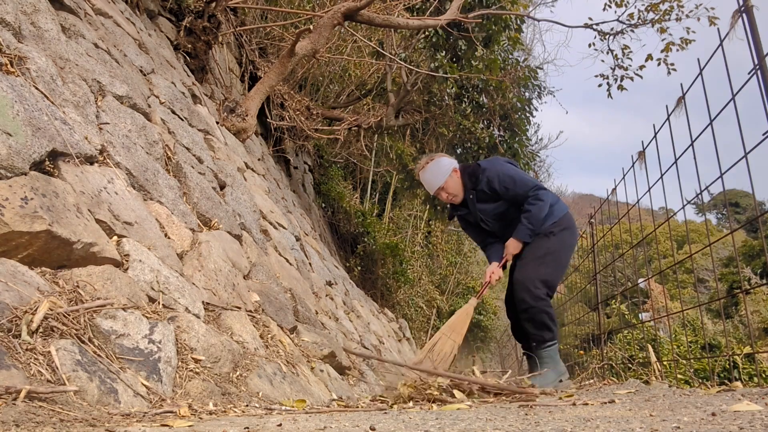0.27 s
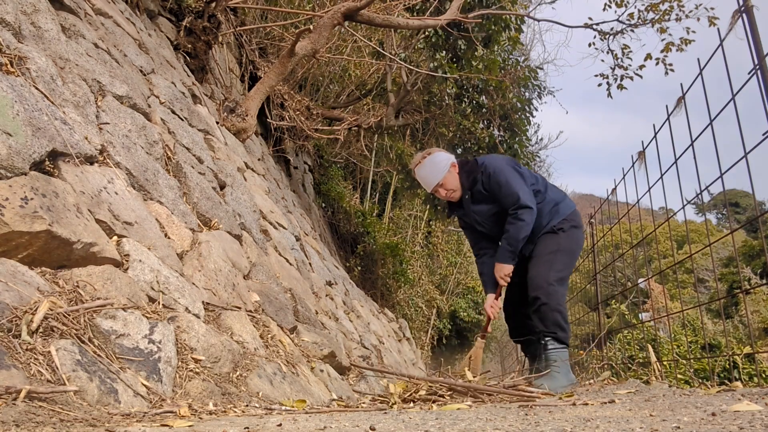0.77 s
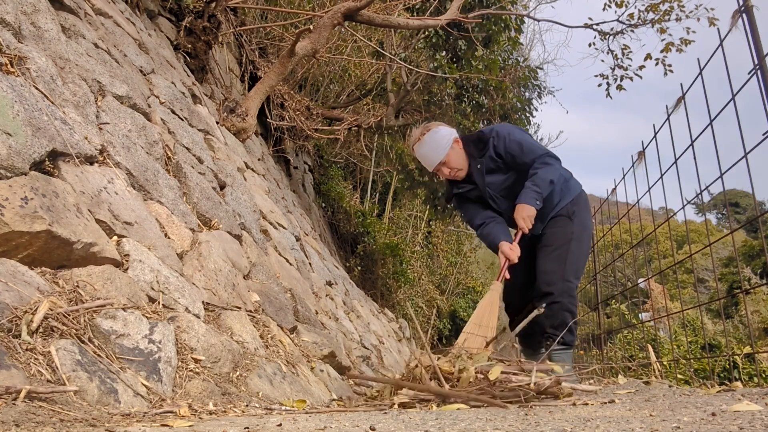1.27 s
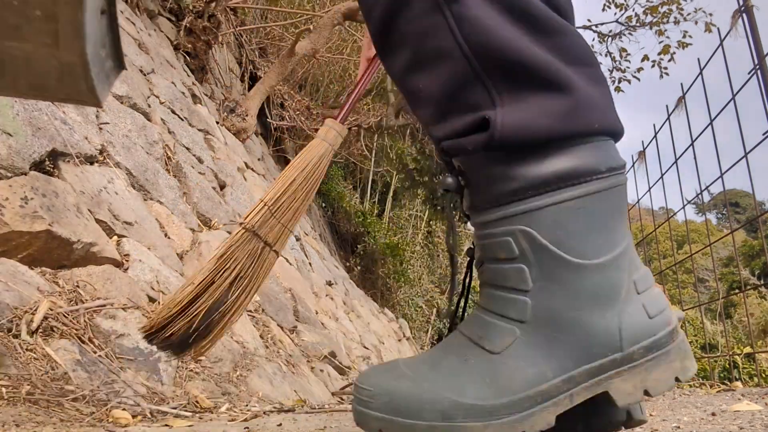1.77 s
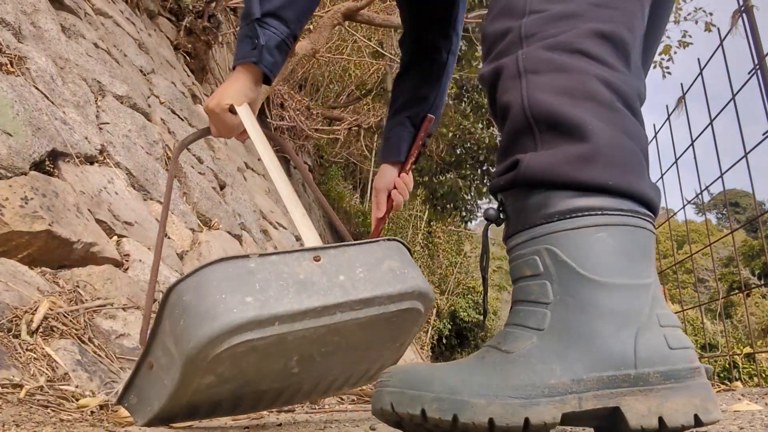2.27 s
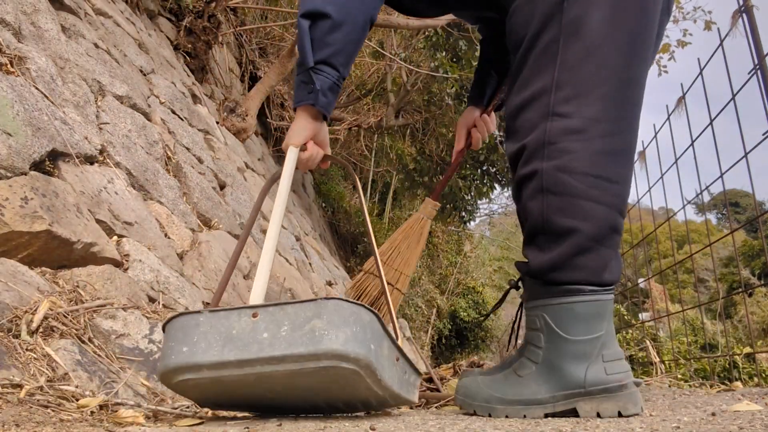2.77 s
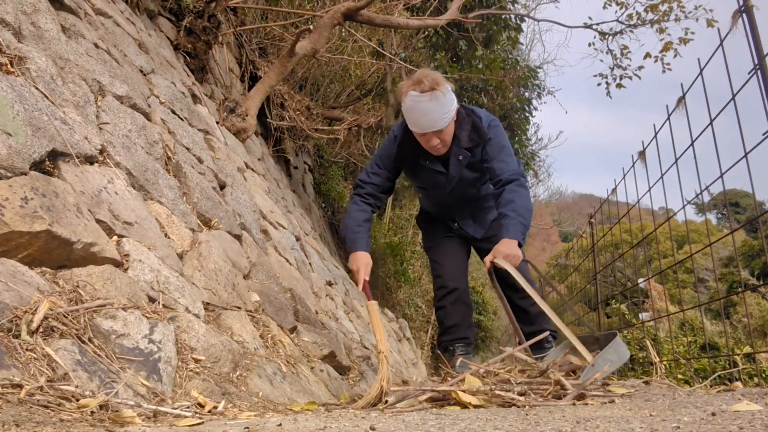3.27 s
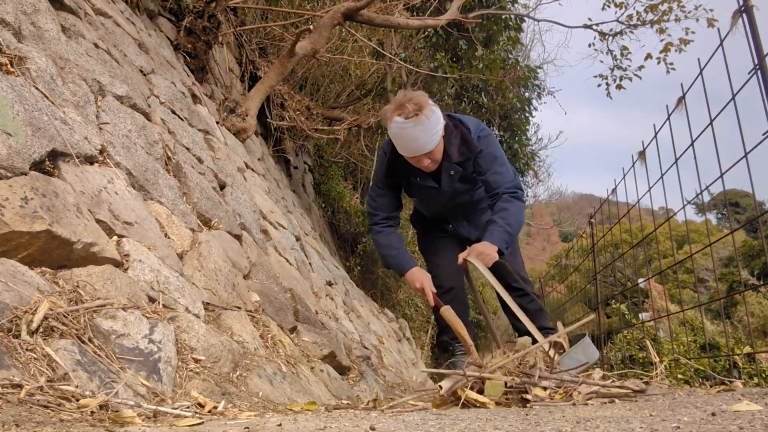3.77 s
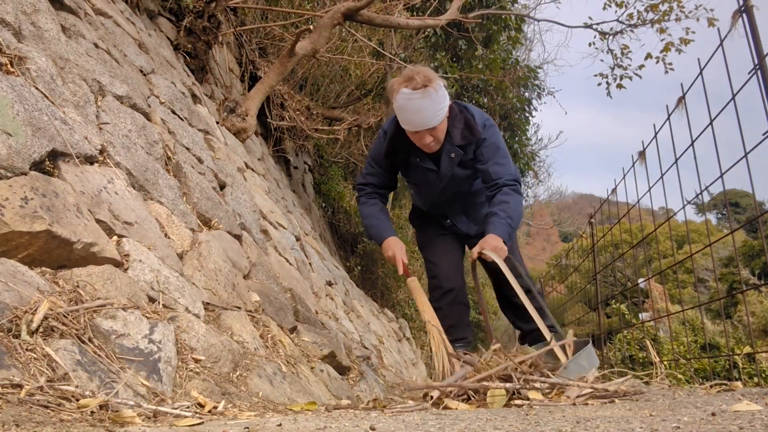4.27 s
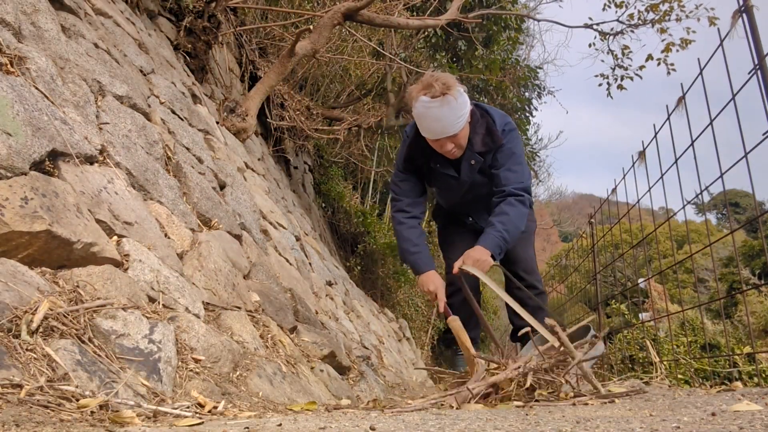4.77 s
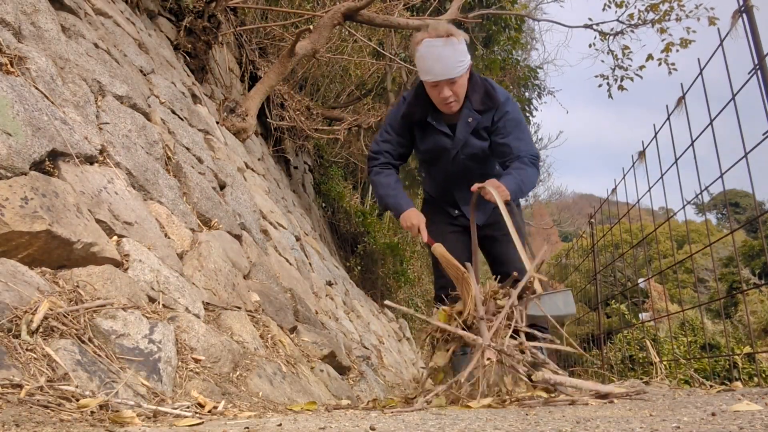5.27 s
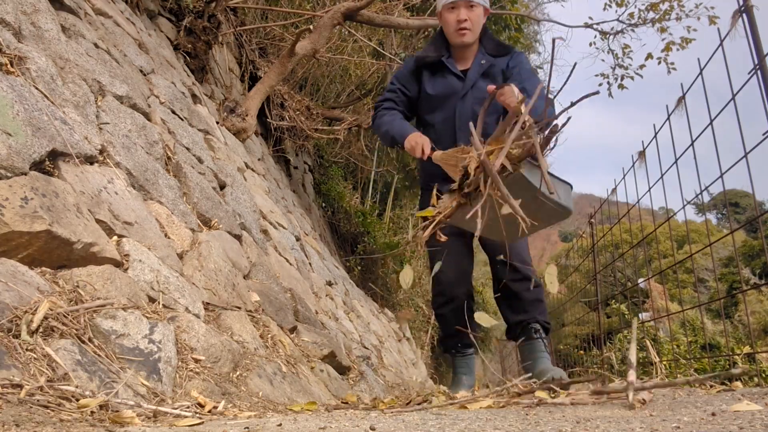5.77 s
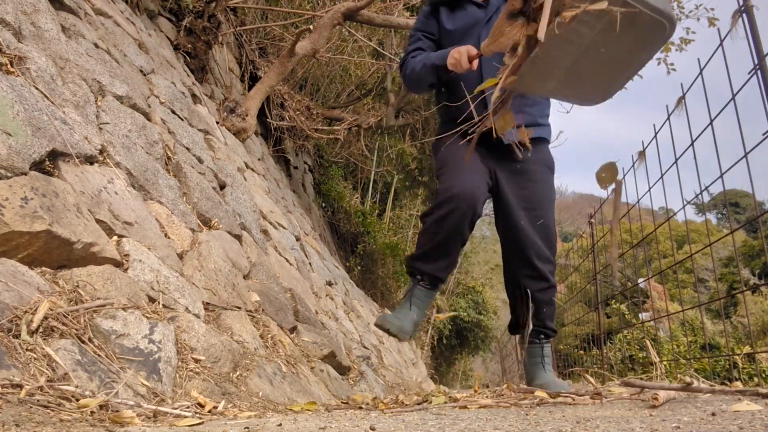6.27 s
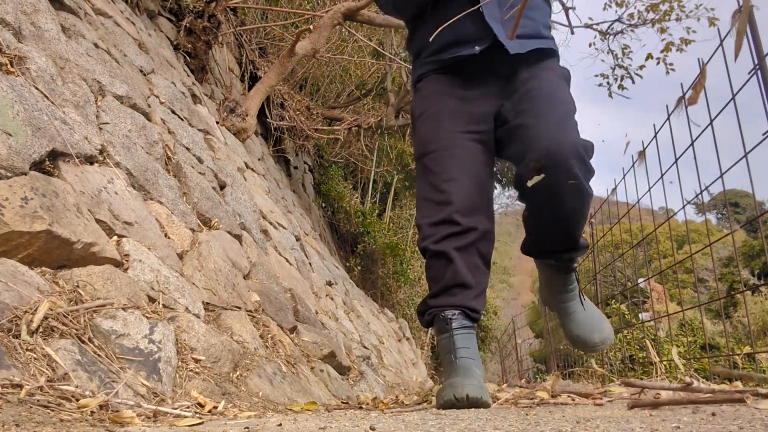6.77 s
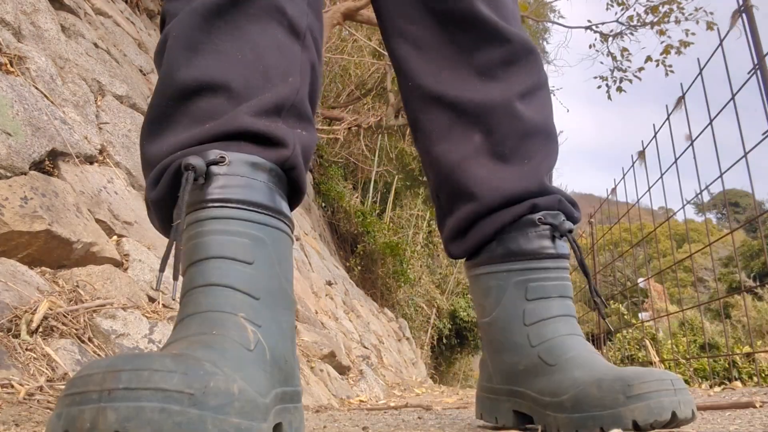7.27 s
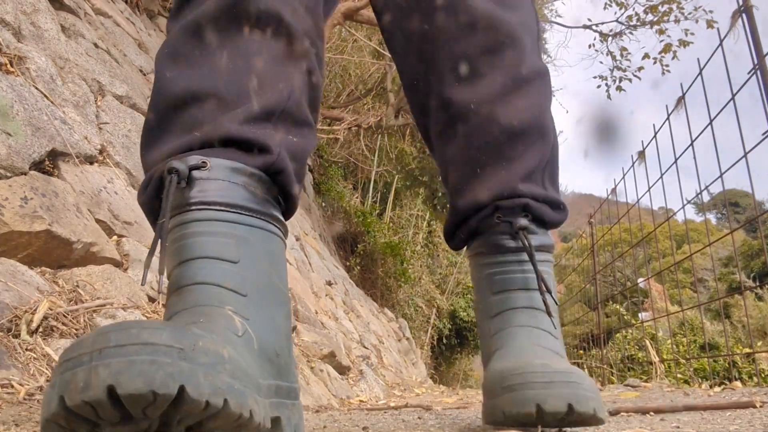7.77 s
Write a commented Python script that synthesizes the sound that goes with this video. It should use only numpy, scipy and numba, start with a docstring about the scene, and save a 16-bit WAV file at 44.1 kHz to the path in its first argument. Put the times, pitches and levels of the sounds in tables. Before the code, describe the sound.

Outdoors, a hand broom sweeps dry leaves and twigs over gravel a few metres away, in short crackling strokes with sharp little snaps. At about 1.5 seconds boots scuff and thump close to the microphone. From 2.2 seconds a sheet-metal dustpan scrapes over stones close by, gritty and hollow, with a loud twig crack and a cluster of ringing knocks, cut off abruptly just before 3 seconds. Sweeping continues further off, and the pan scrapes and clanks several times, strongest between 4.4 and 4.9 seconds. A softer rustle follows. From about 6.4 to 7.1 seconds twigs drop and click on the ground among soft boot steps. From 7.4 seconds the load is tipped out close by, a loud dense crackle of leaves and grit with snaps and dull knocks, lasting to the end at 8 seconds. Light wind rumbles on the microphone in occasional gusts.

```python
"""A hand broom pushes dry leaves and twigs over gravel, outdoors, close to a two-port microphone.
Leaves crackle and gravel crunches as a rain of tiny ringing grains. A sheet-metal dustpan scrapes over
stones, which ring its sheet and the hollow under it; an edit cuts it off, then it is heard further off.
Twigs snap and drop, boots scuff, the load is tipped out close by; light wind rumbles on both ports."""
import sys
import numpy as np
from scipy import signal
from scipy.fft import rfft, irfft
from scipy.io import wavfile
from scipy.ndimage import uniform_filter1d
from numba import njit

SR = 44100
rng = np.random.default_rng(int(sys.argv[2]) if len(sys.argv) > 2 else 0)


def to_wav(s):
    """Save 16-bit WAV."""
    ch = np.atleast_2d(s).T  # columns
    pcm = np.round(np.clip(ch, -1, 1) * 32767)  # PCM
    wavfile.write(sys.argv[1], SR, pcm.astype(np.int16))


N = 354563
LN_1000 = np.log(1000)  # a 60 dB decay, in nepers
CUT_S = 2.931  # an edit cuts off the close scrape and its ring; after it the pan is heard further off
FILLING_S, LIFTED_S = (CUT_S, 5.17), (5.9, 7.1)  # the pan is filled, then lifted


def undb(db):
    """dB to gain."""
    return 10 ** (np.asarray(db) / 20)


def unit(x):
    """Scaled to rms 1."""
    return x / np.sqrt(np.mean(x ** 2))


def between(start_s, end_s):
    """True inside the span."""
    return (np.arange(N) >= start_s * SR) & (np.arange(N) < end_s * SR)


def curves(table):
    """The columns after a table's time column, interpolated sample by sample."""
    times, *columns = np.array(sorted(table)).T
    return np.array([np.interp(np.arange(N) / SR, times, column) for column in columns])


def colour(x, spectrum, taps=4096):
    """Causal filter with the given (Hz, dB) shape, from the cepstrum of the log gain; output rms 1."""
    hz, db = np.transpose(spectrum)
    bins_hz = np.maximum(np.arange(taps // 2 + 1) * SR / taps, 1)
    cepstrum = irfft(np.interp(np.log(bins_hz), np.log(hz), db) * np.log(10) / 20)
    cepstrum[1:taps // 2] *= 2
    cepstrum[taps // 2 + 1:] = 0
    impulse = irfft(np.exp(rfft(cepstrum)))
    return unit(signal.fftconvolve(x, impulse[None], axes=1)[:, :N])


def sides(left_over_right_db):
    """Gains at the left and right ports."""
    return undb(np.array([left_over_right_db, -left_over_right_db]) / 2)


def flicker(hz):
    """Random values, hz a second, joined by ramps; spread near 1."""
    hold = int(SR / hz)
    steps = np.repeat(rng.standard_normal(N // hold + 1), hold)
    return 1.2 * uniform_filter1d(steps, hold)[:N]


@njit
def pings(start, lag, hz, fade, size):
    """Each grain is a short fading sine that reaches the left port lag samples after the right."""
    out = np.zeros((2, N + 2048))
    for k in range(len(start)):
        pole = np.exp(2j * np.pi * hz[k] / SR - fade)
        wave = size[k] * np.exp(1j * hz[k])
        for i in range(min(int(6 / fade), 1900)):
            out[0, start[k] + 40 + lag[k] + i] += wave.imag
            out[1, start[k] + 40 + i] += wave.imag
            wave *= pole
    return out[:, 40:N + 40]


def grains(per_s, band_hz, t60, scatter_db, lag, spread):
    """A random rain of grains, few large and many small, from many directions (lag +- spread samples)."""
    when, pitch, rarity, direction = rng.random((int(per_s * N / SR), 4)).T
    lags = (lag + spread * (2 * direction - 1)).astype(np.int64)
    hz = band_hz[0] + (band_hz[1] - band_hz[0]) * pitch
    size = undb(-scatter_db * np.log(1 - rarity))
    return unit(pings((when * N).astype(np.int64), lags, hz, LN_1000 / (t60 * SR), size))


# Leaves on the gravel as they are swept, trodden and tipped out:
# (time [s], crackle level [dB], crunch re crackle [dB])
LEAF_LEVELS = [(0, -37.5, -3), (.25, -45.5, -9), (.45, -36.5, -10.5), (.6, -38, -8.5), (.78, -45.5, -9),
               (.9, -36.5, -6.5), (1.02, -32, -8), (1.3, -37, -4), (1.47, -42, -11.5), (1.6, -31, -9),
               (1.635, -43.5, -11), (1.74, -47, -7.5), (1.79, -53.5, -5), (1.803, -36, 4),
               (1.82, -53, 16.5), (1.87, -47, 0), (1.96, -62, 7.5), (2.16, -64.5, 1), (2.6, -41.5, 2.5),
               (2.95, -42.5, 0), (3.06, -49.5, 1), (3.15, -54.5, 0.5), (3.25, -42, -11.5), (3.46, -44, -2),
               (3.68, -34.5, -8), (3.8, -45.5, -0.5), (4.1, -47, -6.5), (4.3, -46, 1.5), (4.55, -49, 3),
               (4.75, -38.5, -17), (5.19, -49, 1), (5.2, -37, -5), (5.4, -48.5, -3), (5.75, -50, -7.5),
               (5.92, -47, -5), (6.16, -51.5, -18.5), (6.3, -52, -6), (6.46, -49.5, -3), (6.54, -46.5, -4),
               (6.7, -51.5, -12), (7.2, -49.5, -16.5), (7.4, -38.5, -12.5), (7.5, -27.5, -14.5),
               (7.6, -24.5, -11.5), (7.7, -27, -11), (7.87, -23.5, -11), (8.04, -26.5, -12)]
# Spectra at the microphone: (frequency [Hz], relative level [dB])
NEAR_CRACKLE = [(1290, -21), (2200, -6.5), (5150, -5.5), (5780, -9), (6380, -2.5), (7340, -5), (9790, -7),
                (11800, -4.5), (14800, -9), (15800, -15)]  # leaves close by
FAR_CRACKLE = [(1290, -11), (2200, -4.5), (2370, -6), (5820, -10), (6320, -7.5), (8700, -8.5), (9630, -15),
               (11900, -11.5), (15800, -18)]  # leaves and grit a few metres off
NEAR_CRUNCH = [(59, -16), (100, -8), (187, -5), (355, 5), (596, 5.5), (1090, 3), (1610, -4.5), (2600, -11),
               (3380, -50)]  # gravel and twigs close by
FAR_SWISH = [(88, -47), (150, -18.5), (404, -4.5), (621, 1), (847, -6.5), (1000, 1.5), (2600, -3.5),
             (3380, -0.5), (5720, -120)]  # broom a few metres off


def dry_leaves():
    """Brittle leaves crackle high; twigs and gravel crunch lower, in longer grains."""
    crunch_near = between(1.45, 2.177) | between(7.1, 8.04)  # boots, then the pour, close by
    leaves_far = between(0, 1.45) | between(*FILLING_S)
    level_db, crunch_db = curves(LEAF_LEVELS)
    crackle = grains(14000, (1500, 17000), t60=.004, scatter_db=1.2, lag=-2, spread=12)
    crackle *= undb(1.5 * flicker(hz=30))
    crackle = np.where(leaves_far, colour(crackle, FAR_CRACKLE), colour(crackle, NEAR_CRACKLE))
    crackle *= sides(np.where(crunch_near, -4, -.8))
    crunch = grains(5000, (60.61, 3000), t60=.021, scatter_db=1.4, lag=-2, spread=8)
    crunch *= undb(np.where(crunch_near, 3.5, 1) * flicker(hz=45))
    crunch = np.where(crunch_near, colour(crunch, NEAR_CRUNCH), colour(crunch, FAR_SWISH))
    return undb(level_db) * (crackle + undb(crunch_db) * crunch)


# Open air all around the microphone: (frequency [Hz], relative level [dB])
HUSH_SPECTRUM = [(59, -20), (100, 1.5), (214, -16.5), (441, -3), (1350, -6.5), (2400, -14), (15800, -55)]


def outdoor_hush():
    """A faint steady noise, different at each port."""
    return colour(rng.standard_normal((2, N)), HUSH_SPECTRUM) * undb(-66.5)


# Wind right on the microphone: (time [s], level [dB])
GUSTS = [(0, -56.5), (1.45, -69), (1.6, -47.5), (1.9, -50.5), (2.12, -63), (2.9, -65), (3.02, -66),
         (4.05, -64), (4.2, -49.5), (4.5, -41), (4.85, -64), (4.97, -67), (5.9, -65.5), (6.1, -80),
         (6.55, -52.5), (6.95, -92), (7.15, -49.5), (8.04, -53)]
# Its rumble in the ports: (frequency [Hz], relative level [dB])
RUMBLE_SPECTRUM = [(25, -33.5), (41, -8.5), (64, 1), (161, -9.5), (218, -23.5), (300, -23), (390, -31),
                   (660, -120)]


def wind():
    """Gusts buffet each port, with a little in common; the right is more exposed until the wind veers."""
    noise = rng.standard_normal((3, N))
    rumble = colour(noise[:2] + .5 * noise[2], RUMBLE_SPECTRUM)
    buffet = undb(3.5 * np.array([flicker(hz=14), flicker(hz=14)]))
    exposure = sides(np.where(between(*LIFTED_S), 3, -6))  # veers left for a while, then back
    return rumble * buffet * undb(curves(GUSTS)) * exposure


# Twigs and pebbles on either side of the microphone:
# (time [s], peak level [dB], pitch [Hz], left minus right [dB], broad crack re pitched crack [dB])
TWIG_SNAPS = [(0.2845, -14.5, 5000, -6.5, -3), (0.413, -11, 6700, -1.5, -2),
              (0.4566, -9.5, 7750, 2.5, -17.5), (0.5636, -18, 6850, -1.5, -2), (1.3037, -13.5, 3100, -2, 7),
              (1.4227, -15, 2830, 3, 4), (1.542, -15.5, 5700, -8, -10), (1.5802, -14.5, 8200, -1, 1),
              (1.592, -15, 8150, -4, -7), (1.8045, -19.5, 7060, 3, 3), (1.825, -22.5, 2120, 3.5, -24),
              (1.9096, -22.5, 1660, -1, -5), (2.137, -30, 2190, -2.5, 16), (2.269, -23, 2300, -2, -5),
              (2.3017, -15, 7150, -1.5, -5), (2.311, -15.5, 2540, -0.5, 18), (2.3872, 2, 7700, 1.5, -18),
              (2.852, -5, 7250, 5, -13), (3.033, -22, 7800, 0, -11), (3.413, -22, 6700, 0, -3),
              (5.201, -25, 3600, 2, -5), (5.589, -20.5, 8010, 4.5, 5), (5.772, -26.5, 8160, 0, -1),
              (5.846, -19.5, 5170, 4.5, 0), (6.378, -25.5, 2200, 4, -4), (6.3855, -20.5, 12200, 1, -20),
              (6.4872, -24.5, 2800, 5, -13), (6.514, -12, 4330, -2, 7), (6.5216, -18, 5000, 0, 6),
              (6.543, -6, 2200, 5.5, -9), (6.558, -12, 2840, 2, -3), (6.576, -27, 2160, 1, -7),
              (6.6105, -11.5, 7650, 3.5, 1), (6.6417, -18, 4400, 4.5, -14), (6.6822, -15.5, 4550, 7, -10),
              (6.7375, -24.5, 4530, 7.5, 4), (6.7996, -28, 4700, 7, -12), (6.8067, -20, 3060, 2, -8),
              (6.8295, -21.5, 7330, 5, 4), (6.947, -21, 11400, 6.5, -11), (6.9879, -19.5, 5000, 11, -19),
              (6.997, -17.5, 4470, -6.5, -8), (7.093, -24.5, 12500, 5, 0.5), (7.786, -11, 2500, -4.5, 4),
              (7.96, -12, 3800, -4.5, 2), (7.854, -13, 11900, -16, -5), (7.875, -8, 6510, -4.5, 10)]


def twig_snaps():
    """A sharp crack with a favoured pitch, two small rebounds and a short scatter of grit."""
    out, t = np.zeros((2, N + 4096)), np.arange(4096) / SR
    crack = undb(-60 * t / .0044)
    scatter = undb(-12 - 60 * t / .12)
    for at, db, hz, side_db, broad_db in TWIG_SNAPS:
        noise = rng.standard_normal((3, 4096))
        shared = np.array([np.roll(noise[2], int(-1.5 * side_db)), noise[2]])  # nearer port first
        burst = .66 * noise[:2] + shared
        rebounds_s = .0012 + .006 * rng.random(2)
        cracks = crack + undb(-8) * sum(np.roll(crack, int(delay * SR)) for delay in rebounds_s)
        wide = signal.butter(1, [max(700, .13 * hz), min(4 * hz, 15500)], "band", fs=SR, output="sos")
        narrow = signal.butter(2, [.84 * hz, 1.15 * hz], "band", fs=SR, output="sos")
        broad = signal.sosfilt(wide, burst * (cracks + scatter))
        pitched = signal.sosfilt(narrow, burst * (cracks + undb(-8) * scatter))
        snap = undb(broad_db) * broad + pitched
        start = int(at * SR)
        out[:, start:start + 4096] += undb(db) * snap / np.abs(snap).max() * sides(side_db)[:, None]
    return out[:, :N]


# Boot soles and dull knocks on the ground: (time [s], peak level [dB], pitch [Hz])
BOOT_THUMPS = [(0.285, -32, 1020), (0.414, -34, 1010), (1.538, -28.5, 560), (1.593, -30, 414),
               (1.727, -42, 540), (1.752, -40, 590), (1.797, -38, 264), (1.825, -14.5, 607),
               (1.848, -28, 630), (1.861, -30.5, 268), (1.908, -29, 594), (3.661, -25, 980),
               (3.687, -18, 980), (3.874, -32.5, 547), (6.608, -31.5, 656), (6.836, -43, 1000),
               (6.932, -42, 544), (7.122, -35.5, 152), (7.594, -26.5, 473), (7.664, -42, 570),
               (7.853, -21, 1030), (7.872, -17.5, 1180), (7.974, -21, 1320)]


def boot_thumps():
    """A soft blow: a few cycles that swell in a moment and die fast, alike on both ports."""
    out, t = np.zeros(N + 4096), np.arange(4096) / SR
    for at, db, hz in BOOT_THUMPS:
        envelope = (1 - np.exp(-t / .00071)) * np.exp(-t * hz / 2.1)
        phase = 2 * np.pi * hz * t
        thump = envelope * (np.sin(phase) + .43 * np.sin(1.54 * phase) + .22 * np.sin(.555 * phase))
        start = int(at * SR)
        out[start:start + 4096] += undb(db) * thump / np.abs(thump).max()
    return out[:N]


# The dustpan rim bites the gravel, first close by, then further off:
# (time of full contact [s], swell before it [s], hold [s], knock level [dB], grit re knocks [dB])
RIM_SCRAPES = [(2.179, 0.0029, 0.015, -21.5, 0.5), (2.201, 0.019, 0.028, -20, -9.5),
               (2.373, 0.0044, 0.016, -20.5, -6), (2.401, 0.035, 0.051, -13.5, -7),
               (2.645, 0.01, 0.06, -25.5, -4.5), (2.706, 0.064, 0.065, -16.5, -5),
               (2.796, 0.013, 0.092, -22.5, -10.5), (2.859, 0.004, 0.11, -14.5, -3.5),
               (3.36, 0.15, 0.0043, -35.5, -21), (3.571, 0.055, 0.022, -26.5, -10),
               (3.669, 0.042, 0.028, -29.5, -1), (4.185, .02, 0.0089, -41, -11),
               (4.444, 0.012, 0.024, -22, -10.5), (4.6, 0.029, 0.013, -39.5, -5),
               (4.664, 0.044, 0.0094, -36, -3), (4.697, 0.017, 0.014, -29, -8),
               (4.719, 0.0063, 0.021, -20, -7), (4.843, 0.037, 0.017, -15.5, -8)]


def rim_contact():
    """Gains of knocks and grit: each scrape swells, holds and lets go; loose stones rattle on."""
    release_db_per_s, thinning_db_per_s = 341.5, 80
    t, knock_gain, grit_gain = np.arange(N) / SR, 0, 0
    for at, swell_s, hold_s, db, grit_db in RIM_SCRAPES:
        rattle_db_per_s = 61.5 if at < CUT_S else 142
        released_s = np.maximum(t - at - hold_s, 0)
        tail = undb(-release_db_per_s * released_s) + undb(-16 - rattle_db_per_s * released_s)
        envelope = tail * undb(db + 21 * np.minimum(t - at, 0) / swell_s)
        envelope *= (t < CUT_S) | (at > CUT_S)  # close scrapes end at the cut
        grit_share = undb(grit_db - thinning_db_per_s * np.maximum(t - at, 0))
        knock_gain = np.hypot(knock_gain, envelope)
        grit_gain = np.hypot(grit_gain, envelope * grit_share)
    return knock_gain, grit_gain


@njit
def resonate(drive, poles, gains, moving_pole, moving_gain):
    """A bank of steady modes and one whose pitch moves."""
    out = np.zeros(len(drive))
    for k in range(len(poles)):
        wave = 0j
        for i in range(len(drive)):
            wave = drive[i] + wave * poles[k]
            out[i] += gains[k] * wave.imag
    wave = 0j
    for i in range(len(drive)):
        wave = drive[i] + wave * moving_pole[i]
        out[i] += moving_gain * wave.imag
    return out


LOAD_DAMPING = 1.5  # leaves in the pan shorten the sheet's ring by this factor
# Modes of the pan's metal sheet: (frequency [Hz], relative level [dB], nominal t60 [s])
SHEET_MODES = [(152.2, 4.5, 0.16), (464.5, -0.5, 0.15), (826, -0.5, 0.1), (962, -1.5, 0.31),
               (1017, -0.5, 0.083), (1191, -3.5, 0.1), (1400, 2, 0.14), (1534, -0.5, 0.14), (1670, 0, 0.2),
               (1778, 0, 0.088), (1897, -2, 0.26), (2050, -4, 0.08), (2150, 1.5, 0.072), (2688, -1.5, 0.12)]
# The hollow under the pan as it tilts and is lifted off the ground: (time [s], pitch [Hz])
HOLLOW_PITCH = [(2.18, 573), (2.22, 544), (2.3, 526), (2.38, 650), (2.45, 543), (2.65, 567), (2.73, 631),
                (2.81, 643), (2.87, 601), (2.93, 650), (3.0, 628), (4.44, 643), (4.73, 644), (4.77, 563),
                (4.84, 675), (5.3, 650), (6.3, 995)]


def pan_ring(knocks, near):
    """Knocks ring the sheet and the hollow; both die sooner after the cut, with the pan loaded."""
    hz, mode_db, t60 = np.transpose(SHEET_MODES)
    empty = np.exp(2j * np.pi * hz / SR - LN_1000 / (np.minimum(t60, .22) * SR))
    loaded = empty * np.abs(empty) ** (LOAD_DAMPING - 1)
    gains = undb(mode_db) * np.sqrt(1 - np.abs(empty))
    fade = LN_1000 / (.06 * SR)  # the empty hollow rings for 0.06 s
    hollow = np.exp(2j * np.pi * curves(HOLLOW_PITCH)[0] / SR - fade)
    hollow_gain = undb(4.5) * np.sqrt(fade)
    ring = np.zeros((2, N))
    for port, drive in enumerate(knocks):
        ring[port, near] = resonate(drive[near], empty, gains, hollow[near], hollow_gain)
        ring[port, ~near] = resonate(drive[~near], loaded, gains, hollow[~near] / np.exp(fade), hollow_gain)
    return unit(ring) * np.sqrt(np.mean(knocks ** 2))


# Spectra of the scrape at the microphone: (frequency [Hz], relative level [dB])
NEAR_THUD = [(59, -49.5), (100, -29.5), (398, -22), (615, -7), (760, -16), (908, -16), (1220, -12),
             (1490, -20), (2190, -17.5), (3000, -21), (3900, -53)]  # pan close by
FAR_CLANK = [(59, -52), (100, -22), (271, -19), (654, -4), (787, -15), (989, -1), (1240, -7.5),
             (1900, -4.5), (2290, -10), (3000, -15.5), (3900, -48.5)]  # pan further off
NEAR_GRIT = [(1410, -17), (2400, -14), (3530, -6.5), (4010, -13), (4400, -8.5), (5670, -14.5), (7010, -5),
             (7590, -9.5), (11500, -12.5), (14300, -16.5), (15800, -27)]  # grit under the rim, close by


def dustpan_scrapes():
    """The rim sticks and slips over stones: dense knocks set the pan ringing, grit hisses under it."""
    near = between(0, CUT_S)
    knock_gain, grit_gain = rim_contact()
    knocks = grains(3000, (49.88, 3500), t60=.0071, scatter_db=1.58, lag=4.5, spread=6)
    knocks *= undb(1.5 * flicker(hz=70))
    # After the cut the ports swap: the sound arrives from the other side.
    knocks = knock_gain * np.where(near, colour(knocks, NEAR_THUD), colour(knocks[::-1], FAR_CLANK))
    grit = grains(14000, (1500, 17000), t60=.003, scatter_db=.62, lag=5, spread=9)
    grit *= undb(1.7 * flicker(hz=50))
    grit = grit_gain * np.where(near, colour(grit, NEAR_GRIT), colour(grit[::-1], FAR_CRACKLE))
    grit *= sides(np.where(near, -2.2, -.6))
    ring = undb(np.where(near, -1.5, -3)) * pan_ring(knocks, near)
    return ring + undb(np.where(near, -5.5, -3.5)) * knocks + grit


# Twigs and stones strike the pan, close by, then further off:
# (time [s], peak level [dB], sheet re hollow [dB])
PAN_BLOWS = [(2.709, -6.5, -15.5), (2.727, -5.5, -13.5), (2.747, -7, -13), (2.761, -7.5, -10.5),
             (2.776, -11, -17), (2.804, -18.5, -20.5), (2.853, -8, -5.5), (3.348, -26, -16), (3.57, -26, 3),
             (4.437, -20, -10), (4.446, -24, 16), (4.719, -12.5, -4), (4.734, -13.5, -19.5),
             (4.836, -7, -8), (4.845, -13, -7.5), (6.386, -36, -14), (6.487, -35, -22), (6.806, -36, -29)]


def dustpan_blows():
    """Each blow lands on another spot: the hollow booms briefly, the sheet's modes ring on in a new mix."""
    out, t = np.zeros((2, N + 16384)), np.arange(16384) / SR
    hz, mode_db, t60 = np.transpose(SHEET_MODES)[:, :, None]
    for at, db, sheet_db in PAN_BLOWS:
        near = at < CUT_S
        strength, detune = rng.standard_normal((2, len(SHEET_MODES), 1))
        modes = np.sin(2 * np.pi * hz * (1 + .01 * detune) * t)
        modes *= undb(sheet_db + mode_db + 3 * strength - 60 * LOAD_DAMPING * t / t60)
        modes *= np.minimum(hz / 900, 1) ** 2  # a short blow hardly moves the bass modes
        hollow_hz = np.interp(at, *np.transpose(HOLLOW_PITCH))
        boom = np.sin(2 * np.pi * hollow_hz * t) * undb(-60 * t / .065)
        blow = (modes.sum(axis=0) + boom) * (1 - np.exp(-t / .00071))
        blow *= undb(db) / np.abs(blow).max()
        if near:
            blow *= at + t < CUT_S  # its ring ends at the cut
        right = int(at * SR)
        left = right + (4 if near else -4)
        out[0, left:left + 16384] += blow
        out[1, right:right + 16384] += blow
    return out[:, :N]


def scene():
    """All sources at the microphone; work on the ground is shaded, duller at the left port."""
    hush = outdoor_hush()
    work = dry_leaves() + dustpan_scrapes()
    shaded = signal.sosfilt(signal.butter(2, 12700, fs=SR, output="sos"), work[0])
    work[0] = np.where(between(*LIFTED_S), work[0], shaded)
    return work + hush + twig_snaps() + boot_thumps() + wind() + dustpan_blows()


def record(dry):
    """Peaks are rounded off and the top is cut steeply at 15850 Hz."""
    rounded = np.tanh(1.185 * dry) / 1.061
    return signal.sosfilt(signal.ellip(10, .2, 80, 15850, fs=SR, output="sos"), rounded)


dry = scene()
out = record(dry)
to_wav(out)
```